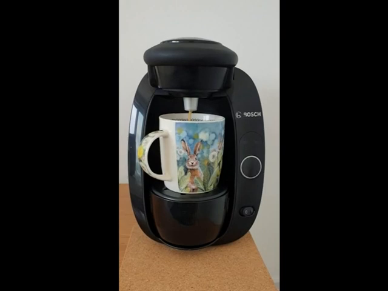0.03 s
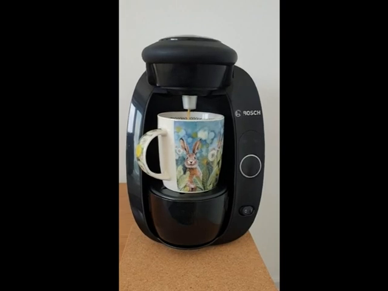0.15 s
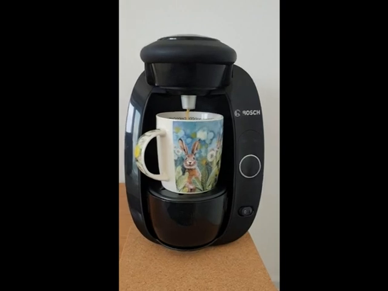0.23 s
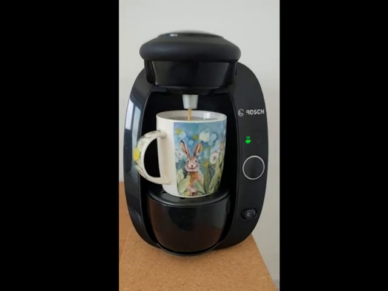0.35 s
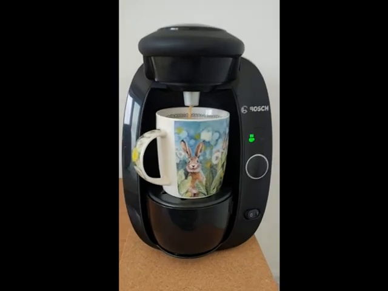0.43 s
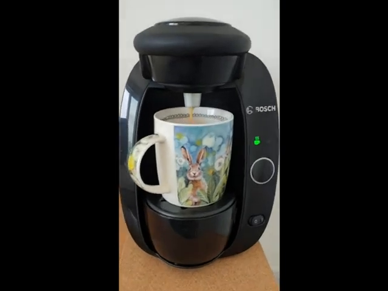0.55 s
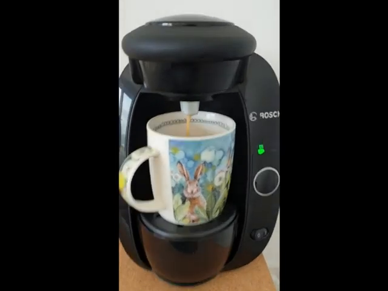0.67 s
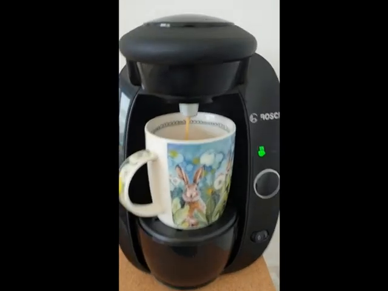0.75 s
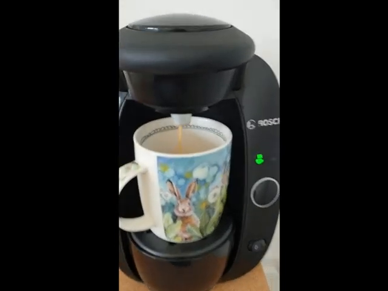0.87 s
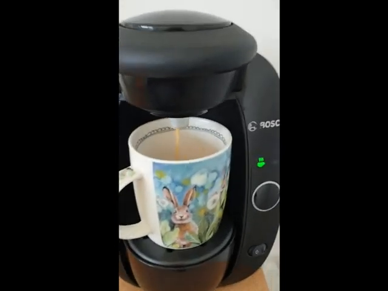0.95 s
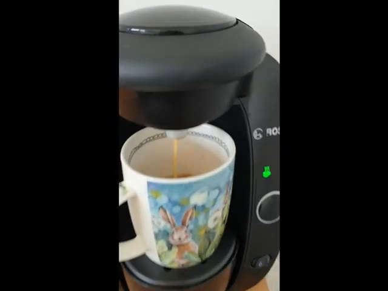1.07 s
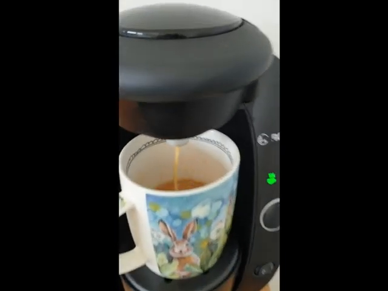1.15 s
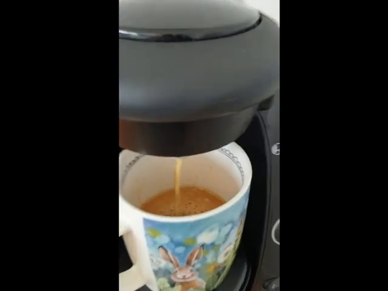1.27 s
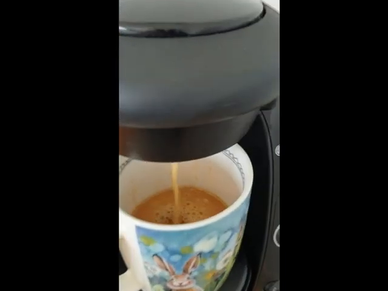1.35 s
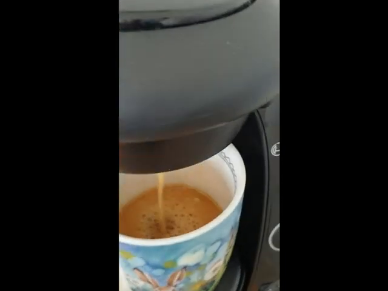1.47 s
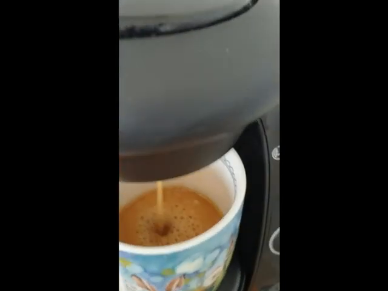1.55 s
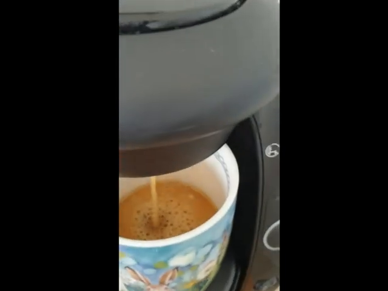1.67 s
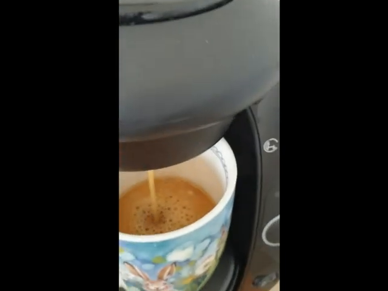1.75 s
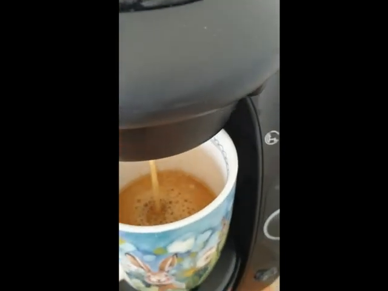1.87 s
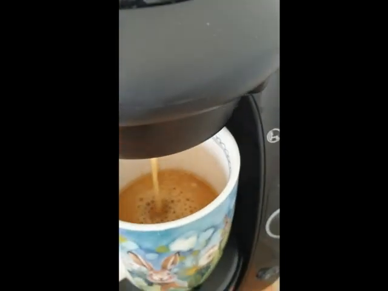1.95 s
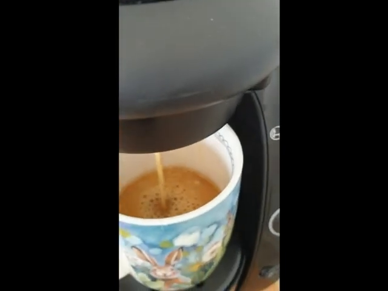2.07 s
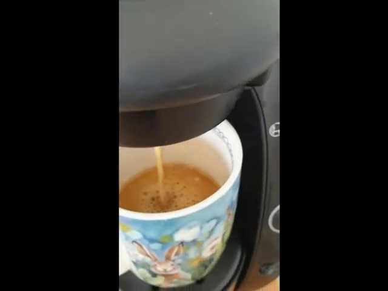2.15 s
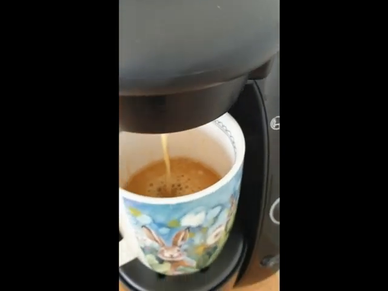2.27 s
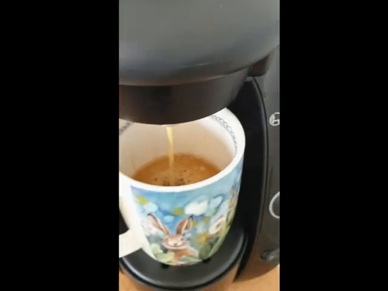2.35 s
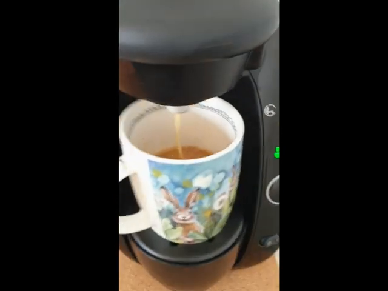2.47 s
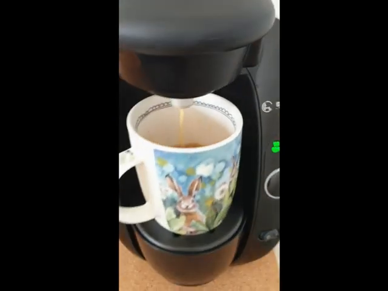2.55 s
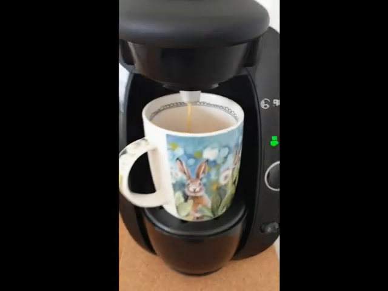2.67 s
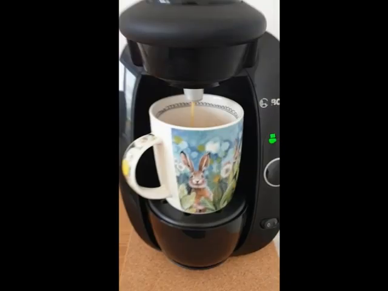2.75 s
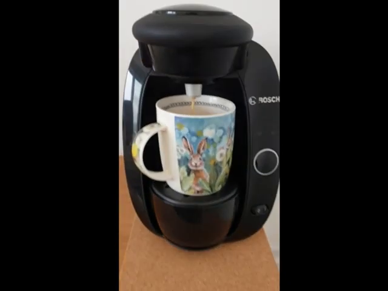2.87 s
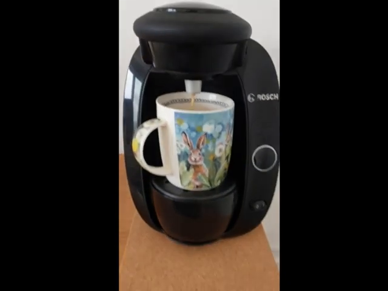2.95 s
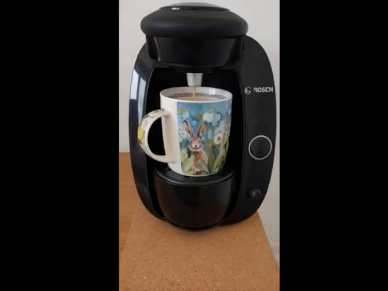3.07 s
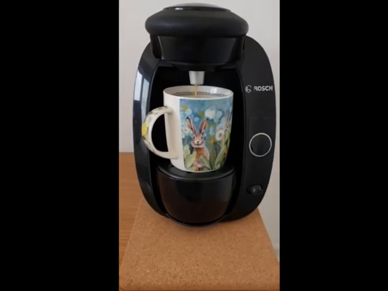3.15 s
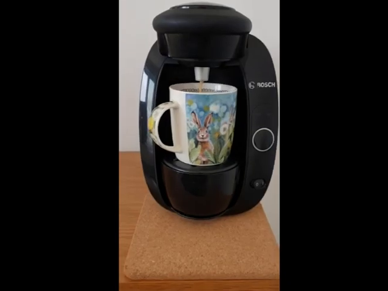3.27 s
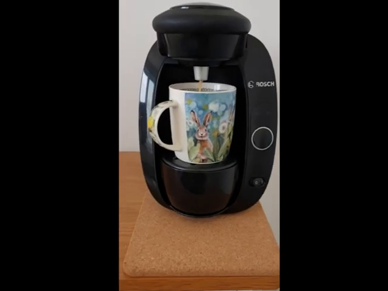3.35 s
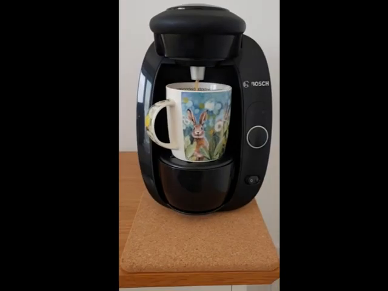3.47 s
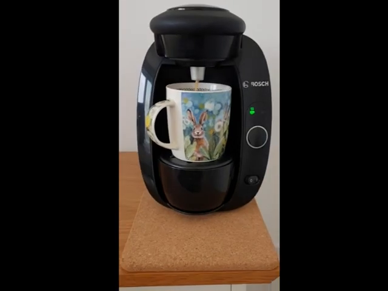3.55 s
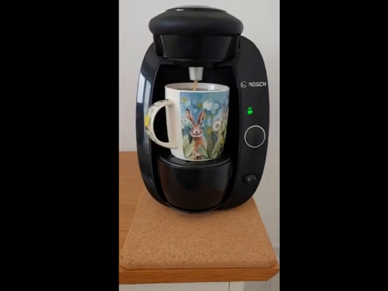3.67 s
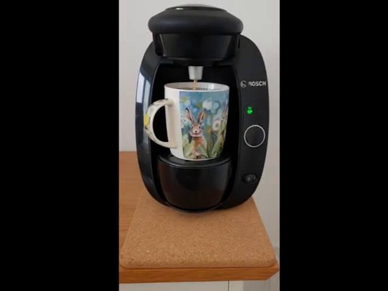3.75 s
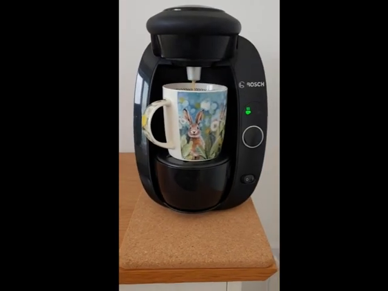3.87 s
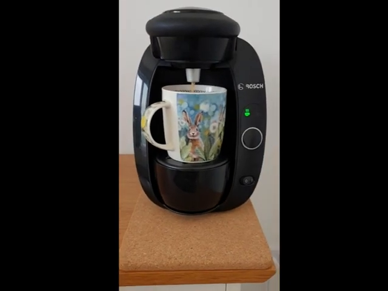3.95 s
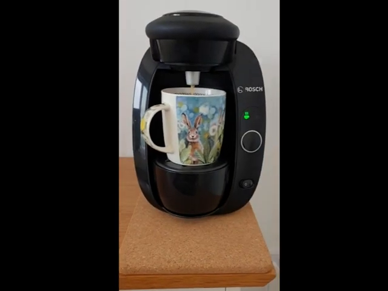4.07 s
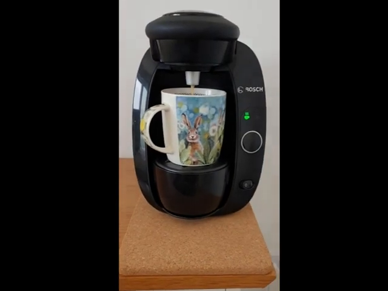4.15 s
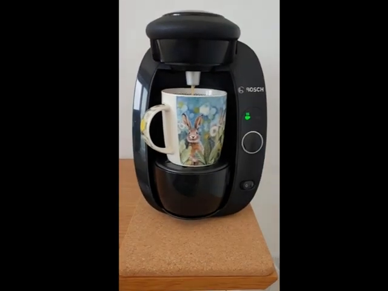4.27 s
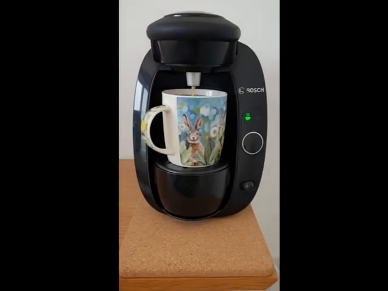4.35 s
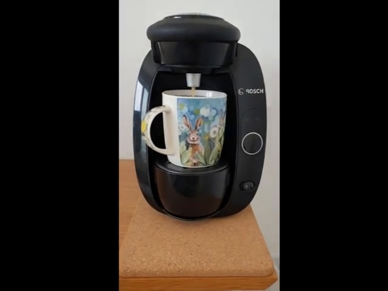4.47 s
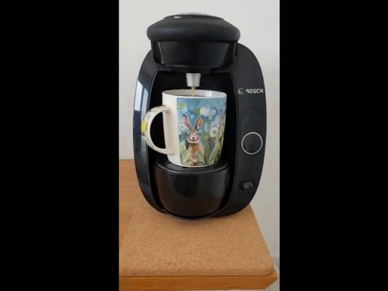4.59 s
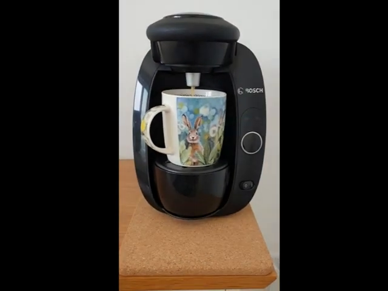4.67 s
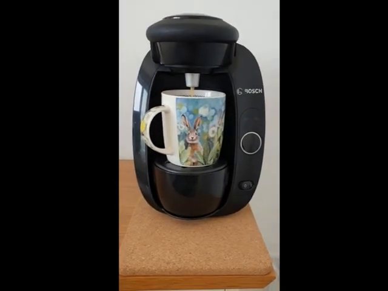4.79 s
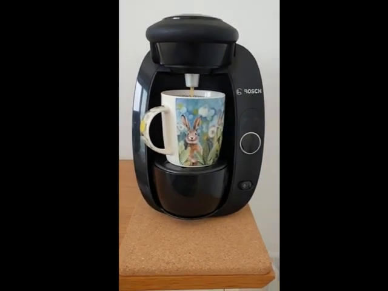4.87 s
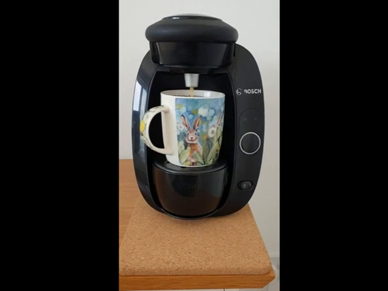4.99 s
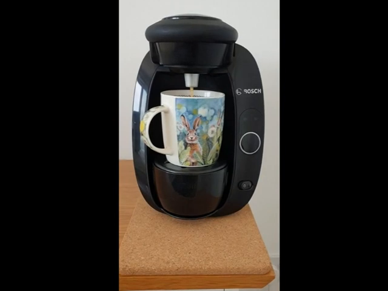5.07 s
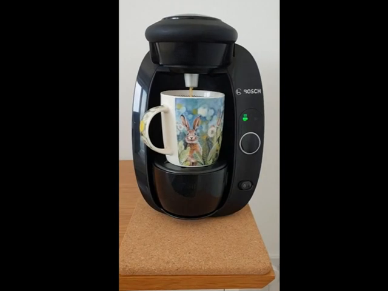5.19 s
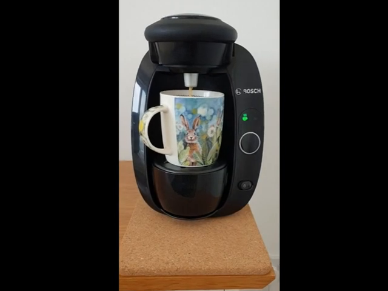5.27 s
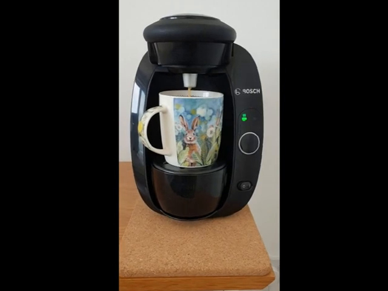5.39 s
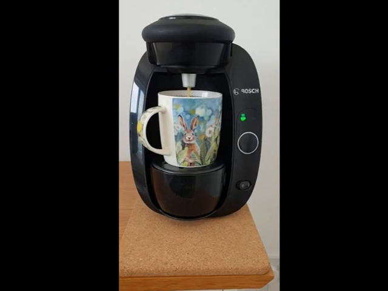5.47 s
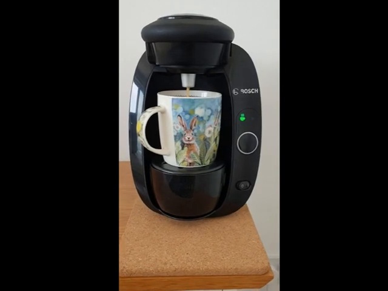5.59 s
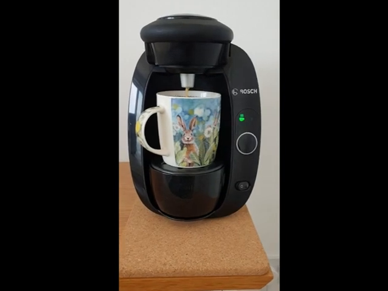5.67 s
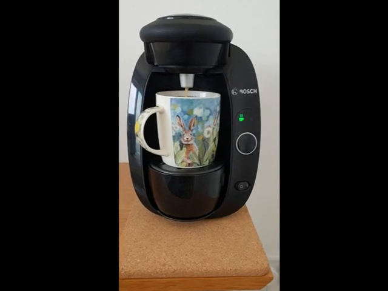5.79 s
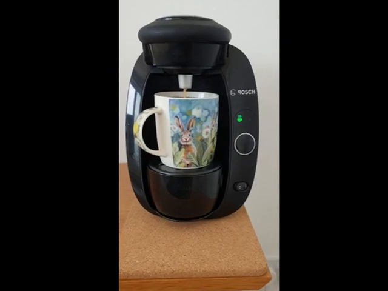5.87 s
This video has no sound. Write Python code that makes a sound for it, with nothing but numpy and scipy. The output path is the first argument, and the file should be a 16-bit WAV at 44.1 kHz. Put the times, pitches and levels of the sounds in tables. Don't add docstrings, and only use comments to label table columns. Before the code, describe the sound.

A pod coffee machine brews without pause in a home kitchen. Its pump gives a low steady hum with a rapid buzzing knock, while coffee trickles and bubbles into a ceramic mug under soft airy hiss. The hand-held phone moves close around one to two and a half seconds, making the rattle, splashes and hiss brighter, then retreats. Faint finger rubs touch its case.

```python
import sys
import numpy as np
from scipy import signal
from scipy.fft import rfft, irfft, next_fast_len
from scipy.io import wavfile
from scipy.ndimage import uniform_filter1d, map_coordinates

SR = 44100
rng = np.random.default_rng(int(sys.argv[2]) if len(sys.argv) > 2 else 0)


def wav_out(sig):
    wavfile.write(sys.argv[1], SR, np.round(np.clip(np.atleast_2d(sig).T, -1, 1) * 32767).astype(np.int16))


def convert_level_to_amplitude(level_db):
    exponent = np.asarray(level_db, float) / 20
    return 10 ** exponent


N = 261513
T = np.arange(N) / SR

# time in seconds, mains frequency in Hz.
MAINS = [(0, 50.06), (1, 50.084), (1.5, 50.075), (2.5, 50.047), (3, 50.043), (4, 50.064), (5.93, 50.058)]
# time in seconds, closeness (0 to 1),
# how much it is still at its first stance (0 to 1), coffee flow in dB.
WALK = [(0, 0, 0.9, 2), (.3, .16, .75, 2.5), (.6, 0.31, .9, 1.5), (.9, 0.35, 0.57, 2.5), (1.2, 0.61, .4, 1),
        (1.5, 0.78, .5, 2.2), (2.1, 0.74, 0.6, 2.5), (2.4, 0.73, 0, 1.5), (2.7, 0.61, 0, 1),
        (3, 0.31, .6, 2), (3.3, 0.1, 0.4, 3), (3.8, .06, 0.3, 1.5), (4.6, 0, 0.2, 1.5),
        (5.93, 0.01, 0.1, 1)]
# frequency in Hz, then the far left, far right, near left
# and near right level in dB per Hz.
POUR_COLOUR = [(25, -76.5, -75, -70, -71.5), (73, -79.5, -74, -78, -76), (125, -75, -89, -78, -72.5),
               (197, -80, -88.5, -80, -87), (290, -99, -90, -94, -93), (372, -83, -77.5, -78.5, -75.5),
               (434, -90.5, -89, -77, -81), (620, -78.5, -81, -83, -80), (780, -86, -87, -82, -73),
               (925, -82.5, -88.5, -82.5, -77.5), (1245, -92, -90, -85, -82), (1370, -91, -92.5, -90, -94),
               (1760, -92.5, -90, -89, -92), (2190, -100, -99, -90.5, -93)]
SPRAY_COLOUR = [(2060, -101, -100, -93.5, -86.5), (2810, -99, -94, -84.5, -89),
                (3320, -105, -101, -88.5, -97.5), (3570, -101, -93, -84.5, -85.5),
                (3810, -105, -100, -89, -88), (3990, -103, -93, -84.5, -88), (4380, -108, -100, -96.5, -93),
                (5440, -102, -97, -90.5, -91.5), (6000, -100, -97.5, -97, -99.5),
                (6320, -101, -97, -89.5, -93), (7060, -108, -103, -104, -100),
                (7170, -115, -108, -110, -103), (7780, -115, -105, -112, -101),
                (8140, -125, -114, -121, -103)]
FIZZ_COLOUR = [(8270, -138, -119, -125, -104), (8670, -130, -126, -123, -113),
               (8600, -128, -127, -118, -117), (8840, -124, -124, -115, -119),
               (10300, -121, -121, -110, -118), (10300, -121, -121, -113, -118),
               (11500, -121, -119, -116, -119), (11850, -117, -113, -117, -108),
               (12800, -118, -114, -117, -109), (13000, -117, -106, -115, -103),
               (13800, -117, -104, -116, -102), (14300, -119, -104, -116, -103),
               (15800, -122, -117, -121, -106), (16000, -125, -120, -129, -112)]
# frequency in Hz, likeness (0 to 1).
POUR_ALIKE = [(60, 0.4), (350, 0.5), (800, 0.5), (1400, 0.2), (2000, 0)]
# start in seconds, pitch in Hz, level in dB.
BUBBLES = [(0.095, 920, -43.5), (0.28, 1012, -48), (0.344, 950, -46), (0.404, 1100, -46),
           (0.527, 1000, -42.5), (0.566, 925, -53), (0.708, 925, -45), (1.038, 895, -43),
           (1.18, 834, -40.5), (1.34, 744, -44), (1.389, 845, -44), (1.504, 940, -39), (1.74, 1012, -45),
           (1.878, 818, -41), (2.026, 530, -46), (2.312, 1050, -50), (2.764, 930, -44), (2.869, 925, -48),
           (2.931, 935, -46.5), (3.179, 925, -44.5), (3.273, 630, -45.5), (3.386, 980, -47.5),
           (3.749, 990, -46), (4.138, 970, -54), (4.635, 940, -47), (4.896, 1055, -49), (5.015, 900, -47),
           (5.12, 537, -44), (5.173, 804, -45.5), (5.347, 1080, -51)]
# start in seconds, length in seconds, level in dB, left over right in dB.
RUBS = [
    (1.721, 0.032, -59, -13),
    (2.408, 0.032, -66, -4.5),
    (3.247, 0.049, -57.5, -17),
    (3.359, 0.03, -58.5, -14),
    (5.036, 0.04, -67.5, -8),
    (5.125, .03, -61, -6.5),
]
# frequency in Hz, level in dB.
SKIN_COLOUR = [(250, -10.5), (1000, 6.5), (4000, -8.5), (7000, -10), (10000, -21), (14000, -10.5),
               (15600, -16)]
# time in seconds, level in dB.
JET = [
    (0, -72.5),
    (.3, -66.5),
    (.75, -59.5),
    (1.1, -65.5),
    (2.4, -65),
    (2.7, -67),
    (3.2, -67),
    (5.4, -65.5),
    (5.93, -68),
]
# frequency in Hz, width in Hz, left dB, right dB.
PANELS = [(1970, 170, -0.5, -0.5), (2645, 250, 1.5, 3), (2600, 200, 4, 3), (3506, 160, 1, -3),
          (4090, 76, -7, 2.5), (5350, 150, -9, -11)]
# time in seconds, peak level in dB, left over right
# in dB.
TICKS = [(1.3907, -47, -4), (1.4122, -45, -5), (1.574, -40, -10), (1.6926, -39, 1), (1.7256, -35.5, -0.5),
         (1.7535, -44, 2), (1.7719, -54, -3), (1.8317, -49, 3), (1.8951, -40, -6), (1.935, -39, 2),
         (1.9714, -50, 10), (2.092, -48, -2), (2.4114, -37, 2), (2.4508, -43, 4), (2.4713, -43, -6),
         (3.3598, -42, -4)]
# level in dB at the first stance, near the mug and at
# the last stance, then left over right in dB when far and when near.
SWAY = [(-45.3, -45.4, -45.4, -.5, -1.5), (-35, -33.7, -35.7, -.1, 1.2), (-42, -39, -40.5, 3.5, 3),
        (-53, -49.5, -54.5, -2.1, -2.1), (-56, -57.2, -61, 1.5, 2.5), (-73.5, -60.2, -71.7, 4.7, -2.5)]
KNOCK = [(-78, -49.5, -69.5, -3, 0.5), (-67, -47, -61.5, 18, -5), (-80, -56.5, -65, 8, -4.5),
         (-63, -51, -61.5, -3.8, 4), (-59, -55.5, -62.5, -2.5, -9.5), (-72, -77, -79.5, 4, 21),
         (-55, -56, -62.5, -6, -3.5), (-56.5, -59.5, -63.5, -3, 5.5), (-63.5, -60.5, -65.5, 2, -5),
         (-61.5, -53.5, -56.5, -13.5, -9), (-68.5, -64.5, -61.5, -5, 1.5), (-67.5, -61.5, -75, 7, -4.5),
         (-61.5, -53.5, -72.5, 3.5, -0.5), (-75.5, -69.5, -71, -1, -6.5), (-59, -73.5, -76, 0, -2),
         (-62, -74, -64, -4.5, 2.5), (-64, -81, -73.5, 4.5, 7), (-78, -67.5, -78, -11.7, -5),
         (-62, -58.5, -68, -1.5, 3), (-61, -57.5, -72.5, -6, -8.5), (-73, -68, -75, 6.5, -1.5),
         (-75.5, -67.5, -67, -2, 0.5)]
# centre in Hz, width in Hz, top level in dB,
# at the first stance, near the mug and at the last stance in turn.
SHELL = [
    [(1610, 170, -70), (1610, 180, -68.5), (1795, 70, -70.5)],
    [(2040, 50, -73), (2190, 390, -77.5), (2040, 200, -92)],
]
# frequency in Hz, step in dB per Hz.
ROUNDING_STEPS = [(1000, -110), (2000, -104), (6300, -104), (7300, -104), (8500, -107), (9300, -109.5),
                  (11200, -107.5), (13500, -106), (14600, -105), (15100, -102)]


def unit(x):
    return x / np.sqrt(np.mean(x ** 2) + 1e-20)


def along(hz, points_hz, values):
    return np.interp(np.log(hz + 1), np.log(np.asarray(points_hz) + 1), values)


def walk(t):
    s, *cols = np.transpose(WALK)
    return [np.interp(t, s, c) for c in cols]


def wobble(rate):
    coarse = T[::128]
    knots = rng.standard_normal(int(N * rate / SR) + 4)
    return np.interp(T, coarse, map_coordinates(knots, [coarse * rate]))


def filtered(x, response):
    m = next_fast_len(N + SR // 4)
    return irfft(rfft(x, m) * response(np.fft.rfftfreq(m, 1 / SR)), m)[..., :N]


def resonance(f, f0, width):
    return 1j * f * width / (f0 * f0 - f * f + 1j * f * width)


def stroke():
    mains_hz = np.interp(T, *np.transpose(MAINS))
    return 2 * np.pi * np.cumsum(mains_hz) / SR - .63


def rush(colours, alike, patchy_db, size, lo_hz, hi_hz):
    hz, t, (a, b) = signal.stft(rng.standard_normal((2, N)), SR, nperseg=size)
    turn = np.arccos(np.clip(along(hz, *np.transpose(alike)), -1, 1))[:, None] / 2
    shared, apart = np.cos(turn) * a, np.sin(turn) * b
    pair = np.array([shared + apart, shared - apart])

    points, *cols = np.transpose(colours)
    far_l, far_r, near_l, near_r = (along(hz, points, c)[:, None] for c in cols)
    close = walk(t)[0]
    db = np.array([far_l + close * (near_l - far_l), far_r + close * (near_r - far_r)])

    patches = uniform_filter1d(rng.standard_normal(a.shape), size=5, axis=0)
    patches = unit(uniform_filter1d(patches, size=4, axis=1))
    coloured = pair * convert_level_to_amplitude(db + patchy_db * patches)
    wide = signal.istft(coloured, SR, nperseg=size)[1][:, :N] * np.sqrt(SR / 2)
    return filtered(wide, lambda f: (f >= lo_hz) & (f < hi_hz))


def fingers():
    noise = rng.standard_normal((2, N))
    skin = unit(filtered(noise, lambda f: (f > 200) * convert_level_to_amplitude(along(f, *np.transpose(SKIN_COLOUR)))))
    rise_s, grain_db = .006, 2
    shape = np.zeros((2, N))
    for s, length, db, pan_db in RUBS:
        since = np.clip(T - s, 0, None)
        fade = np.minimum(since / rise_s, 1) * np.exp(-(since / length) ** 2)
        shape += convert_level_to_amplitude(db + np.array([[pan_db], [-pan_db]]) / 2) * fade
    return skin * shape * convert_level_to_amplitude(grain_db * wobble(250))


def whistle():
    centre_hz, width_hz = 6140, 270
    jet = rng.standard_normal((3, N)) * convert_level_to_amplitude(0.87 * wobble(40) + 1.2 * wobble(3.3))
    sung = filtered(jet, lambda f: resonance(f, centre_hz, width_hz) ** 2)
    shared, left, right = unit(sung)
    level_db = np.interp(T, *np.transpose(JET)) + np.array([[1.5], [3.5]])
    return convert_level_to_amplitude(level_db) * np.array([shared + 0.72 * left, 0.84 * right - shared])


def bubbles():
    draw = rng.random((500, 4))
    crowd_s = draw[:, 0] * N / SR
    crowd_hz = 860 * np.exp(.7 * (draw[:, 1] - .5))
    crowd_db = np.minimum(-58 - 3.5 * np.log(draw[:, 2]), -50) + 3 * walk(crowd_s)[0]
    crowd = np.c_[crowd_s, crowd_hz, crowd_db]

    s, hz, db = np.r_[crowd, np.array(BUBBLES) + [.002, 0, 9]].T[..., None]
    cycles = hz * np.arange(1200) / SR
    swell = (cycles / 1.53 * np.exp(1 - cycles / 1.387)) ** 2
    rising = np.sin(2 * np.pi * cycles * (0.947 + 0.023 * cycles))
    wave = convert_level_to_amplitude(db) * swell * rising
    at = (s * SR).astype(int) + np.arange(1200)
    mug = np.bincount(at.ravel(), wave.ravel(), N + 1200)[:N]
    return mug * convert_level_to_amplitude([[-1.2], [1.2]])


def stream():
    close, _, flow_db = walk(T)
    low_hz, high_hz = 2200, 8050
    pour = rush(POUR_COLOUR, POUR_ALIKE, patchy_db=2.0, size=2048, lo_hz=36.4, hi_hz=low_hz)
    pour *= convert_level_to_amplitude(flow_db + 0.53 * wobble(7))

    push_db = 2.1 * close * np.cos(stroke() + 1.8)
    spray = rush(SPRAY_COLOUR, [(2000, 0.15), (9000, 0.05)], patchy_db=1.0, size=512,
                 lo_hz=low_hz, hi_hz=high_hz)
    spray *= convert_level_to_amplitude(flow_db - 2.0 + 0.59 * wobble(12) + push_db)

    fizz = rush(FIZZ_COLOUR, [(12000, 0.06)], patchy_db=2.4, size=512, lo_hz=high_hz, hi_hz=SR / 2)
    fizz *= convert_level_to_amplitude(-0.3 + 0.87 * flow_db + .5 * wobble(9))
    return pour + spray + fizz


def rattle():
    knocks = np.flatnonzero(np.diff(np.floor((stroke() + 2.3) / (2 * np.pi))))
    draw = rng.standard_normal((len(knocks), 6))
    delay_s = np.array([0, .0021, .0058]) + np.abs(draw[:, :3]) * [.00002, .0003, .001]
    at = knocks[:, None] + (SR * delay_s).astype(int)
    blow_db = np.array([0, -7, -7]) + [2.5, 4, 4] * draw[:, 3:]
    size = convert_level_to_amplitude(blow_db - 35.5 + 12.0 * walk(at / SR)[0])
    blows = np.tile(np.bincount(at.ravel(), size.ravel(), N + SR)[:N], (2, 1))
    for s, db, pan_db in TICKS:
        blows[:, round(s * SR)] += convert_level_to_amplitude(db + 23.0 + np.array([pan_db, -pan_db]) / 2)

    def panels(f):
        return sum((-1) ** k * convert_level_to_amplitude([[left], [right]]) * resonance(f, hz, width)
                   for k, (hz, width, left, right) in enumerate(PANELS))

    return filtered(blows, panels)


def overtones():
    hz = np.arange(29, 47)[:, None] * MAINS[0][1]
    centre_hz, width_hz, top_db = np.transpose(SHELL)[:, :, None]
    rings = convert_level_to_amplitude(top_db) * (np.abs(resonance(hz[None], centre_hz, width_hz)) ** 2 + 0.059)
    ring_db = 20 * np.log10(rings.sum(axis=2)).T
    pan_db = 3.5 * rng.standard_normal((len(hz), 2))
    return np.r_[SWAY, KNOCK, np.c_[ring_db, pan_db]]


def pump():
    angle, out = stroke() % (2 * np.pi), np.zeros((2, N))
    close, first = np.clip(walk(T)[:2], 0, 1)
    ports = np.array([[.5], [-.5]])
    for k, (first_db, near_db, last_db, far_pan_db, near_pan_db) in enumerate(overtones(), 1):
        far_db = last_db + first * (first_db - last_db) + ports * far_pan_db
        near_db = near_db + ports * near_pan_db
        near = np.clip((close - .2 * first) / (1 - .2 * first), 0, 1)
        near = near ** (.5 if k < 11 else .8)

        sway = -1.5 - 1.8 * (k == 2)
        knock = 2.2 + 1.5 * k + rng.normal(0, .025 * k, (2, 1))
        knock += (k > 10) * rng.uniform(-np.pi, np.pi)
        if 21 < k < 31:
            knock = 2.8 + 1.5 * k - 2.5 * (k - 25) + rng.normal(0, .35, (2, 1))
        phase = sway if k < 7 else knock

        unsteady = min(k / 12, 1)
        db = far_db + near * (near_db - far_db) + unsteady * .6 * wobble(2.34)
        turn = k * angle + phase + unsteady * .17 * wobble(3.2)
        out += convert_level_to_amplitude(np.float32(db)) * np.cos(np.float32(turn))
    return np.sqrt(2) * out


def scene():
    return pump() + rattle() + stream() + bubbles() + whistle() + fingers()


def rounded(x, grid=599, size=1024):
    n, k = np.arange(2 * size)[:, None] + .5, np.arange(size) + .5
    hz = k * SR / size / 2
    window = np.sin(np.pi * n / size / 2)
    basis = window * np.cos(np.pi / size * (n + size / 2) * k) * np.sqrt(2 / size)
    lead, count = 2 * size - grid, N // size + 4
    blocks = np.pad(x, ((0, 0), (lead, count * size - N - lead))).reshape(2, count, size)
    coefs = np.concatenate([blocks[:, :-1], blocks[:, 1:]], axis=2) @ basis

    band_power = np.mean(coefs.reshape(2, count - 1, -1, 32) ** 2, axis=(0, 3))
    band_db = 10 * np.log10(band_power + 1e-16)
    budget_db = 1.7 * rng.standard_normal((count - 1, size // 32))
    budget_db += .6 * (band_db - np.median(band_db, axis=0))
    step_db = along(hz, *np.transpose(ROUNDING_STEPS)) + budget_db.repeat(32, axis=1)
    step = convert_level_to_amplitude(step_db) * np.sqrt(SR / 2)

    bits = unit(uniform_filter1d(rng.standard_normal(count - 1), size=3))
    bits += walk(np.arange(count - 1) * size / SR)[0]
    bits += .3 * (band_db[:, 20] - np.median(band_db[:, 20]))
    edge_hz = 14600 + 200 * rng.standard_normal(count - 1)
    coefs *= (bits > .25)[:, None] | (hz < edge_hz[:, None])

    steps = np.floor(np.abs(coefs) / step + .4)
    frames = (np.sign(coefs) * steps * step) @ basis.T
    out = frames[:, 1:, :size] + frames[:, :-1, size:]
    return out.reshape(2, -1)[:, lead - size:][:, :N]


def roll_off(x):
    return signal.sosfilt(signal.butter(12, 15700, fs=SR, output="sos"), x)


def record(dry):
    mix = rounded(dry)
    return roll_off(mix)


dry = scene()
out = record(dry)
wav_out(out)
```